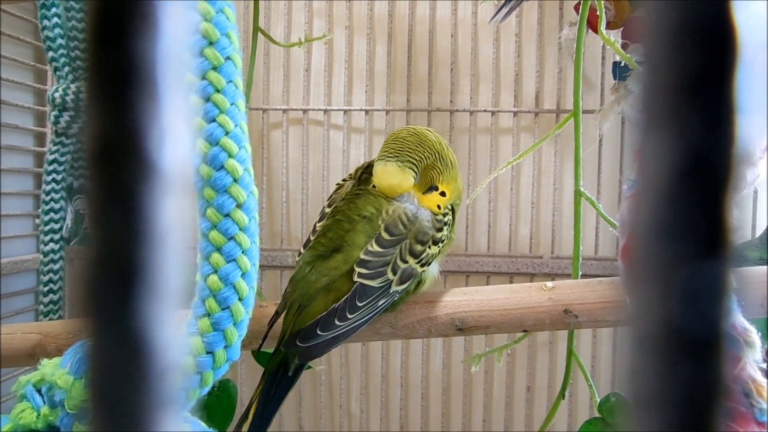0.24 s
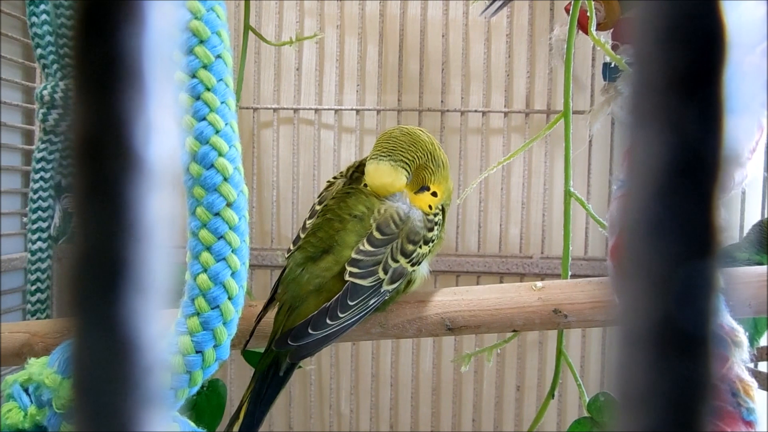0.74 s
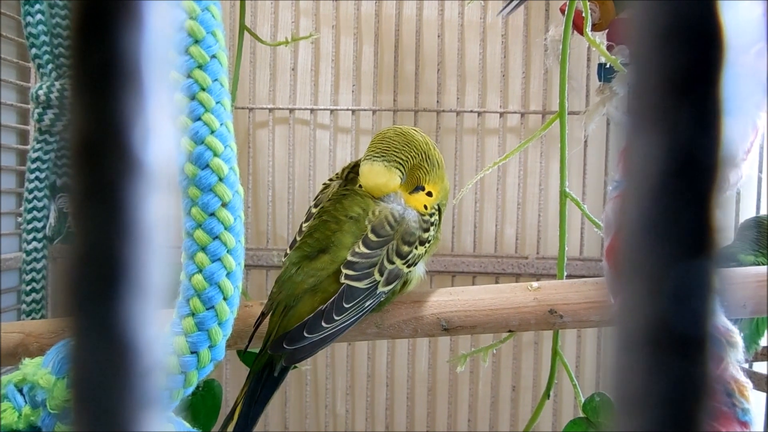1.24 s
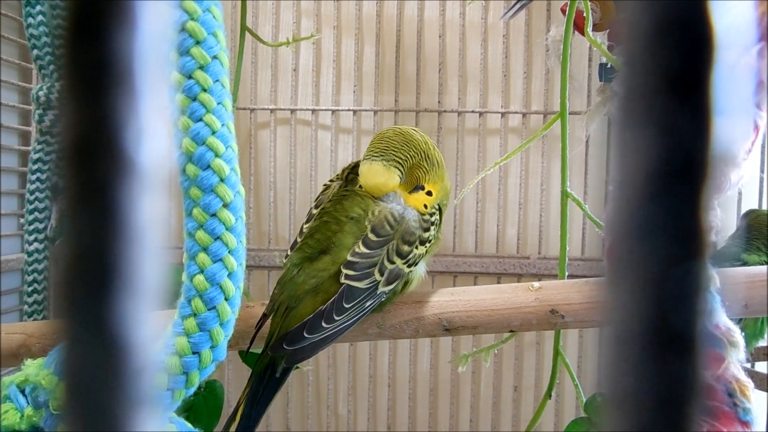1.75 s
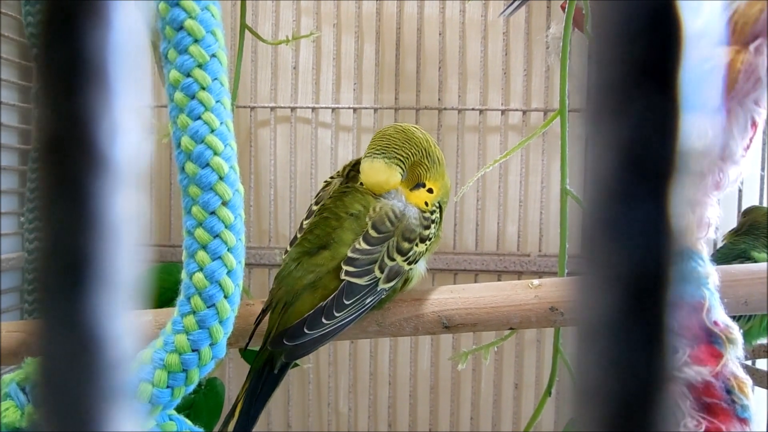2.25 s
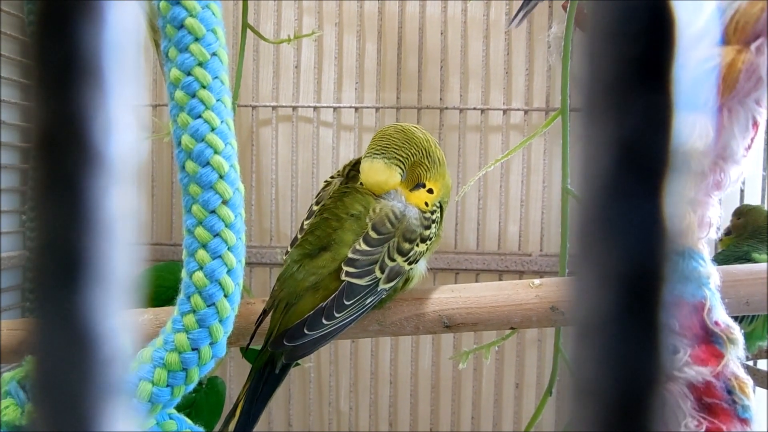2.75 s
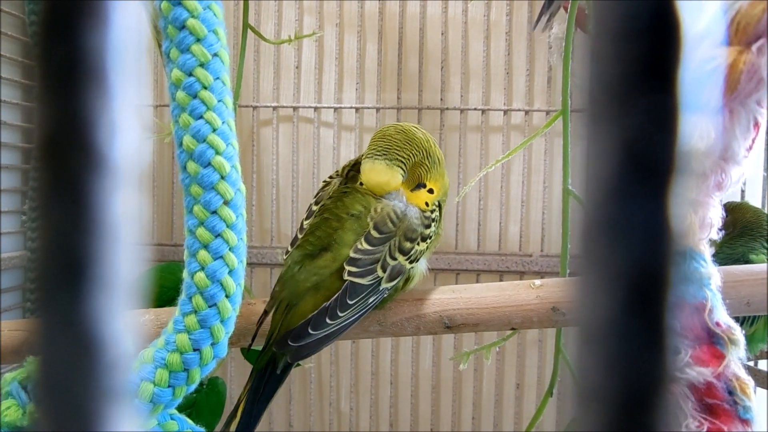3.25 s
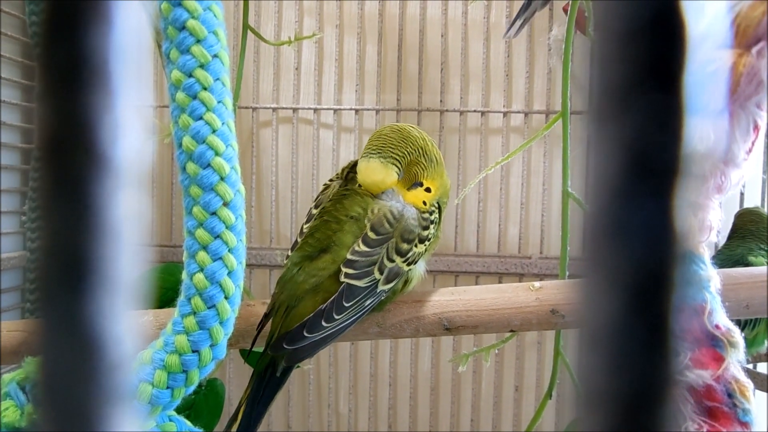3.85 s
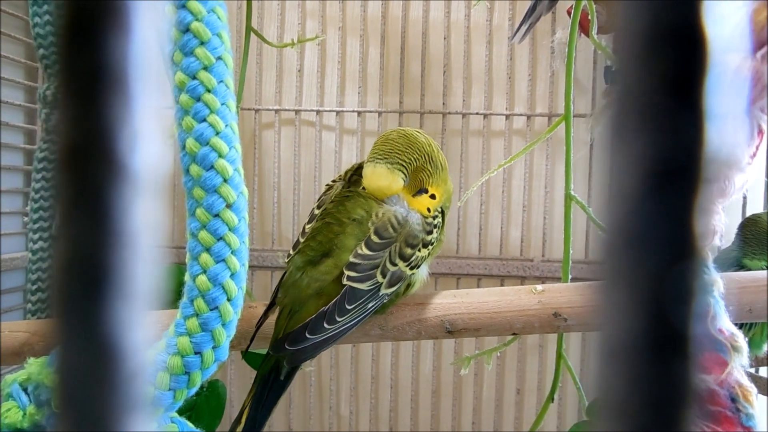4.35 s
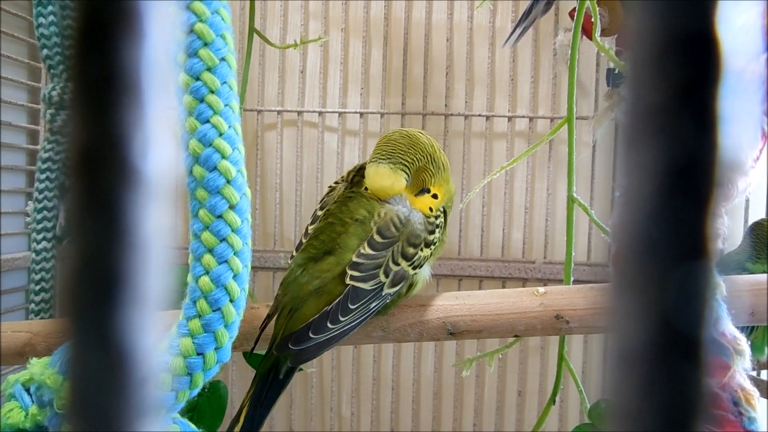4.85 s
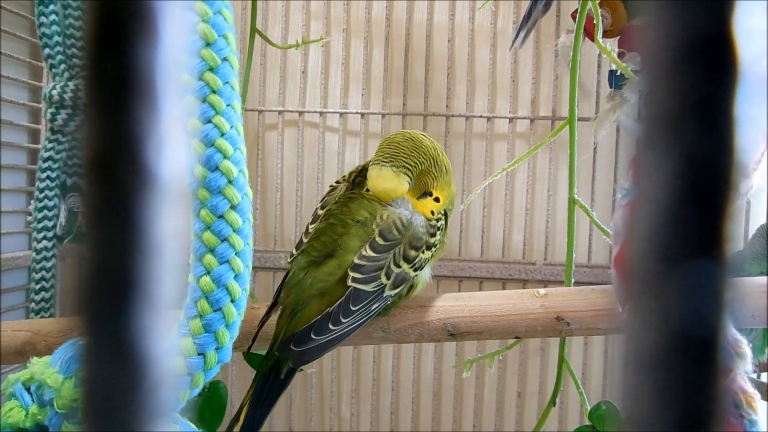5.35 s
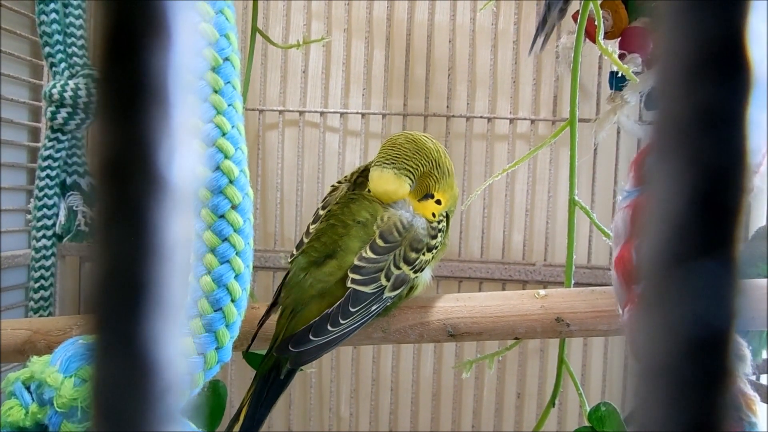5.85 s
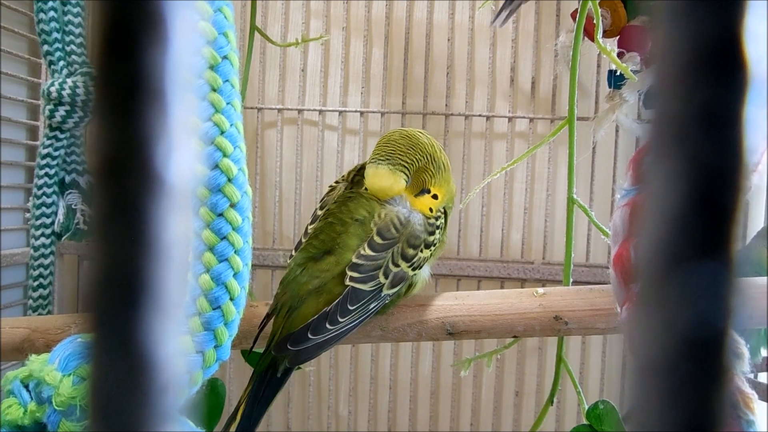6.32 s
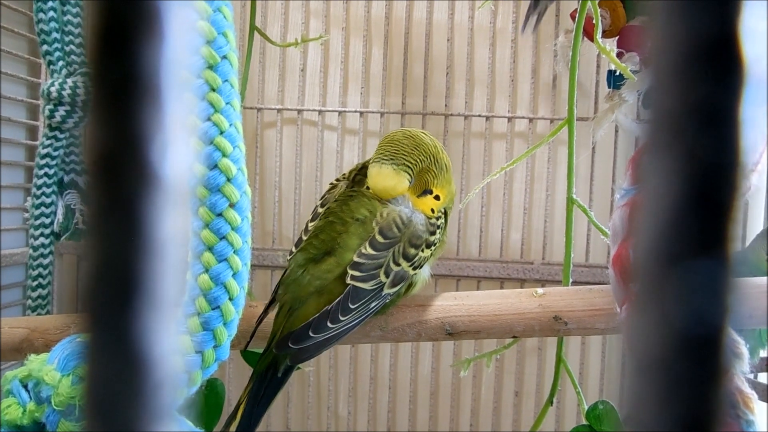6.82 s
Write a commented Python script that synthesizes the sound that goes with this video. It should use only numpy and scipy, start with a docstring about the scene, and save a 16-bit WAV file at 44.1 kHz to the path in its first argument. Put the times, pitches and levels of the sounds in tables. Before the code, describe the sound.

Close, bright budgerigar chatter, slightly right of centre, in a small live room. Near birds trade sharp chirps, tiny clicking chips, tumbling twitter runs and pulsed, scratchy squawks in irregular clusters. Farther birds keep up a softer busy warble with tiny lulls. A thin constant hush lies beneath. Two squawks come close together near the end, then only a few light notes follow as the background chatter continues.

```python
"""Caged budgerigars indoors, near the ear: gliding whistles and chips start at once, a squawk follows at 0.8 s.
Whistles, chips, squawks and twittering phrases overlap; a nasal buzz comes at 4.2 s, dense whistles near 5.1 s.
Two squawks near 6.8 s and a few late notes close it. Farther birds warble, with lulls, over a steady hush.
Whistles are swept overtone series, squawks pulsed tone and rasp, chips steep sweeps, the hush shaped noise.
Surfaces colour the calls, the room rings after them, and the loudest calls overload the recorder."""
import sys
import numpy as np
from scipy import signal
from scipy.fft import rfft, irfft
from scipy.io import wavfile

SR = 44100
rng = np.random.default_rng(int(sys.argv[2]) if len(sys.argv) > 2 else 0)


def pcm_store(signal):
    """Save signal as 16-bit PCM."""
    levels = np.round(np.clip(np.atleast_2d(signal), -1, 1) * 32767)
    wavfile.write(sys.argv[1], SR, levels.astype(np.int16).T)


N = 312228

# Steady hush spectrum. Each row: frequency in Hz, relative density in dB per Hz.
HUSH_SPECTRUM = [(20, 2), (60, 3.5), (100, -4), (600, -3), (1300, 1.5), (3200, 6), (5000, -12.5),
                 (13000, -16)]
HUSH_LEVEL_DB = -45
# Room decay. Each row: frequency in Hz, 60 dB decay time in seconds.
ROOM_DECAY = [(300, 0.05), (1200, 0.66), (3000, 0.78), (7000, 0.87), (12000, 0.59)]
# Pauses of the far birds. Each row: start in seconds, end in seconds.
FAR_LULLS = [(.6, 0.75), (.88, 1.026), (2.27, 2.45), (3.04, 3.4), (4.1, 4.24), (4.55, 4.67), (4.87, 5.12),
             (5.68, 5.7)]
# Throat and beak response to the overtones. Each row: frequency in Hz, gain in dB.
BEAK_RESPONSE = [(1500, -11), (3200, -2.5), (4600, -4.5), (6200, -9.5), (8200, -2), (9300, -13),
                 (13000, -29.5)]
# Colour of a hoarse squawk. Each row: frequency in Hz, relative density in dB per Hz.
RASP_SPECTRUM = [(120, -53), (250, -39), (625, -25.5), (1350, -15), (2100, -5), (3600, 2), (5600, 5),
                 (8200, 4.5), (13200, -27)]
# Low sliding notes, often closing a phrase. Each row: start in seconds, length in seconds, level in dB.
LOW_SLIDES = [(0.045, .04, -30), (.24, 0.074, -33.5), (0.582, 0.068, -36.5), (0.978, .05, -34),
              (1.09, .1, -34.5), (1.258, 0.097, -33), (1.457, 0.064, -40), (1.731, 0.063, -33),
              (2.052, 0.045, -31), (2.364, 0.068, -35), (2.609, 0.058, -41), (2.742, .045, -36.5),
              (2.994, 0.056, -31.5), (3.275, 0.034, -32), (3.356, 0.062, -39.5), (3.785, .05, -38),
              (4.106, 0.094, -36), (4.864, .05, -32), (5.162, .028, -29.5), (5.233, 0.053, -30.5),
              (5.428, 0.034, -39), (5.558, 0.068, -33), (6.021, .06, -35.5), (6.191, 0.085, -35),
              (6.588, 0.05, -42.5)]
# Pitch of every low slide: start in Hz, middle in Hz, end in Hz.
SLIDE_PITCH_HZ = (1824, 1348, 940)
# Quick runs of syllables stepping down in pitch.
# Each row: start in seconds, length in seconds, level in dB, overtone level in dB.
TWITTER_PHRASES = [(0.027, 0.06, -18.5, -9), (.12, 0.25, -27.5, -10.5), (0.453, .13, -25, -10.5),
                   (1.109, 0.16, -34.5, -2.5), (1.362, 0.067, -32.5, -1.5), (1.52, 0.17, -25, -9.5),
                   (1.821, 0.16, -30.5, -7.5), (2.01, .07, -16.5, -8), (2.482, .22, -31, -5),
                   (2.711, 0.18, -31.5, -8), (2.877, .15, -29, -8.5), (3.198, .12, -25, -12),
                   (3.471, .14, -31, -10.5), (3.921, 0.18, -34, -20), (4.295, .16, -36.5, -11),
                   (4.69, .17, -27, -3.5), (5.055, .12, -21.5, -7), (5.352, .11, -24.5, -1),
                   (5.81, .19, -25, -13), (6.124, 0.11, -21, -8), (6.279, 0.11, -30.5, -19),
                   (6.601, 0.11, -32.5, -11), (6.968, 0.054, -31.5, -24)]
PHRASE_TOP_HZ, PHRASE_END_HZ = 3170, 2089
SYLLABLE_S, SYLLABLE_FALL_OCT, SYLLABLE_ARCH_OCT = .026, 0.2986, 0.1003
# Click-like whistles. Each row: start in seconds, peak level in dB before the trim, pitch in Hz at 30 % of its length.
NEAR_CHIPS = [(.211, -11, 3080), (0.314, -20, 3240), (0.739, -27, 3000), (1.42, -15, 2586),
              (2.011, -7, 2500), (2.113, -16.5, 4660), (2.332, -12, 4360), (3.183, -9.5, 3000),
              (3.501, -10.5, 2550), (3.654, -5.5, 3310), (3.85, -9, 3334), (4.076, -13.5, 3405),
              (5.042, -14.5, 2990)]
# Pulsed harsh calls. Each row: start in seconds, length in seconds, level in dB, pitch in Hz,
# pulse rate per second, roughness 0-1, loudest moment as a fraction of the length.
NEAR_SQUAWKS = [(.762, 0.11, -8.5, 2890, 157, 0.78, 0.76), (2.006, 0.084, -21, 2686, 150, 0.56, 0.9),
                (2.14, 0.13, -12, 3120, 130, 0.79, 0.57), (2.485, 0.085, -16.5, 3050, 174, 0.5, 0.76),
                (4.48, 0.066, -14.5, 2946, 155, 0.34, 0.72), (5.148, 0.03, -31, 3600, 160, 0.47, 0.5),
                (5.603, 0.07, -13.5, 2980, 170, 0.28, 0.99), (6.12, 0.084, -36, 3200, 160, 0.62, 0.28),
                (6.424, 0.13, -14, 2892, 172, 0.86, 0.32), (6.772, 0.11, -11.5, 3424, 176, 0.82, 0.58),
                (6.854, 0.067, -15.5, 2838, 157, 0.39, 0.93)]
# Prominent whistles. Each row: start in seconds, length in seconds, centre pitch in Hz, fall in octaves,
# level in dB, overtone level in dB.
NEAR_CHIRPS = [(0, 0.019, 3155, 0.014, -12.5, -14), (.014, 0.046, 2308, 0.63, -15, -7.5),
               (0.136, .033, 3130, 0.45, -18, -10.5), (.217, .05, 2910, 0.59, -23.5, -8.5),
               (0.513, 0.065, 3100, 0.87, -25.5, -14), (1.058, 0.041, 2400, 0.41, -24.5, -3),
               (1.182, .032, 2250, 0.51, -25.5, -8.5), (1.437, 0.032, 2400, .9, -27.5, -8.5),
               (1.608, 0.042, 2880, 0.74, -14, -19), (1.676, 0.044, 3083, .36, -10.5, -15),
               (1.974, 0.035, 3583, .3, -12, -7.5), (2.022, 0.037, 2917, .4, -12.5, -28),
               (2.433, 0.051, 3550, 0.28, -25, -5.5), (3.134, 0.033, 3050, 0.07, -20.5, -8.5),
               (3.164, .034, 3510, 0.2, -22, -7), (3.225, 0.062, 3118, .4, -16, -13.5),
               (3.312, .05, 2355, 0.33, -32, -25), (3.612, .066, 2700, 0.35, -25.5, -18),
               (3.748, 0.028, 2513, 0, -21.5, -28), (3.776, 0.061, 3594, 0.41, -22, -13.5),
               (3.844, .03, 3090, 0.063, -17, -19), (4.714, 0.06, 3020, 0.82, -18.5, -6),
               (4.8, .056, 3113, 0.58, -18, -10), (5.063, .043, 3822, 0.091, -13.5, -7),
               (5.108, 0.021, 3106, .35, -10.5, -9), (5.127, .032, 3250, 0.11, -7.5, -24),
               (5.157, .03, 3284, 0.43, -14, -11), (5.252, 0.042, 2150, 0.32, -29.5, -32),
               (5.353, 0.021, 2600, .3, -24, -6), (5.393, 0.046, 2950, -0.26, -17.5, -13),
               (5.511, 0.051, 2405, 0.64, -22, -33), (5.851, 0.059, 2290, 0.33, -22.5, -9),
               (6.019, 0.071, 3900, 0.19, -22.5, -7.5), (6.093, 0.035, 3253, 0.086, -9.5, -13),
               (6.147, 0.049, 2734, 0.62, -18, -25), (7.036, .048, 2994, 0.604, -25, -30)]
CHIRP_ARCH_OCT = 0.0499
BAND_LIMIT_HZ = 13500


def gain_of(db):
    """Decibels to amplitude."""
    return 10 ** (np.asarray(db) / 20)


def evened(x):
    """Scales to an rms of one."""
    return x / np.sqrt(np.mean(x ** 2) + 1e-20)


def read(points, hz):
    """Interpolates a frequency table on a log-frequency axis."""
    table_hz, value = np.transpose(points)
    return np.interp(np.log(hz + 1), np.log(table_hz), value)


def add(mix, start_s, sound):
    """Adds a stereo sound at start_s, cut at the end of the mix."""
    first = max(round(start_s * SR), 0)
    part = mix[:, first:][:, :sound.shape[1]]
    part += sound[:, :part.shape[1]]


def wobble(t, rate_hz, count=512):
    """Random unsteadiness: straight lines between rate_hz random values per second."""
    return np.interp(t * rate_hz, np.arange(count), rng.standard_normal(count))


def noise(spectrum, count, size=8192):
    """Random noise filtered to the given spectrum."""
    size = max(size, count)
    colour = gain_of(read(spectrum, np.fft.rfftfreq(size, 1 / SR)))
    coloured = irfft(rfft(rng.standard_normal(size)) * colour, size)
    return evened(coloured)[:count]


def hush():
    """Steady background noise, independent in each channel."""
    return gain_of(HUSH_LEVEL_DB) * np.array([noise(HUSH_SPECTRUM, N), noise(HUSH_SPECTRUM, N)])


def room(x, rise_s=0.011, size=256):
    """A diffuse tail: noise that fades in, then dies at its own speed in each band."""
    hz, t, bands = signal.stft(rng.standard_normal((2, SR)), SR, nperseg=size)
    decay = gain_of(-60 * t / read(ROOM_DECAY, hz)[:, None])
    bands = bands * decay * np.minimum(t / rise_s, 1)
    tail = signal.istft(bands, SR, nperseg=size)[1]
    tail = tail / np.linalg.norm(tail[0])
    return signal.fftconvolve(x.mean(0)[None], tail, axes=1)[:, :N]


def perch(call, reach_s=.011, count=10, size=1024, echo_db=-6.5):
    """Direct sound plus early reflections, along random paths for every call."""
    paths = np.zeros((2, size))
    for ear in paths:
        late = rng.random(count)
        at = np.minimum(4 + late * reach_s * SR, size - 1).astype(int)
        bounces = rng.choice([-1, 1], count) * np.exp(-2 * late)
        ear[at] = gain_of(echo_db) * evened(bounces) / np.sqrt(count)
    left_delay = rng.choice([0, 0, 1, 2, 3])  # samples
    paths[0, left_delay] = 1
    paths[1, 0] = 1
    # so small a body gives no bass
    bass_cut = signal.butter(2, 450, "high", fs=SR, output="sos")
    thin = signal.sosfilt(bass_cut, call)
    return signal.fftconvolve(thin[None], paths, axes=1)


def syrinx(hz, overtones_db, tilt_db=-3, count=8):
    """A fundamental with locked overtones, tilted and then shaped by the beak."""
    phase = 2 * np.pi * np.cumsum(hz) / SR
    k = np.arange(2, count + 1)[:, None]
    overtone_db = overtones_db + tilt_db * (k - 2) + read(BEAK_RESPONSE, k * hz)
    overtones = gain_of(overtone_db) * (k * hz < BAND_LIMIT_HZ)
    return np.sin(phase) + (overtones * np.sin(k * phase)).sum(0)


def chirp(length_s, start_hz, middle_hz, end_hz, db, overtones_db,
          jitter=0.035, flutter_db=4.5, attack_s=0.0027, fade=0.16):
    """A whistle on a parabolic pitch curve; high notes zigzag quickly, low ones glide more evenly."""
    t = np.arange(0, max(length_s, .008), 1 / SR)
    progress = t / t[-1]
    curve = np.polyfit([0, .5, 1], [start_hz, middle_hz, end_hz], 2)
    hz = np.polyval(curve, progress)
    zigzag = np.interp(hz, [1500, 2800], [.02, .075]) * wobble(t, 170)
    hz = hz * (1 + jitter * wobble(t, 2400) + zigzag)
    attack = np.minimum(t / attack_s, 1)
    release = np.minimum((1 - progress) / fade, 1)
    strength = attack * release * gain_of(flutter_db * wobble(t, 400))
    strength = strength / np.sqrt(1 + (950 / hz) ** 8)  # low notes are poorly radiated
    voice = syrinx(hz, overtones_db + 1.96 * wobble(t, 349))
    return perch(gain_of(db) * evened(strength) * np.sqrt(2) * voice)


def stroke(length_s, pitch_hz, fall_oct, db, overtones_db, arch_oct=CHIRP_ARCH_OCT):
    """A chirp falling through its pitch, bulging above the straight fall."""
    octaves = np.array([fall_oct / 2 - arch_oct, arch_oct, -fall_oct / 2 - arch_oct])
    return chirp(length_s, *(pitch_hz * 2 ** octaves), db, overtones_db)


def warble(count, low_hz, high_hz, db, overtones_db, spread=.27):
    """Farther birds: random chirps, mostly downward, left out during the lulls."""
    out = np.zeros((2, N))
    for k in range(count):
        centre_s = (k + rng.random()) / count * N / SR
        length_s = rng.uniform(.014, .045)
        bend = spread * rng.uniform(-1, 1, 3) + [0, 0, -.2]
        contour_hz = np.minimum(rng.uniform(low_hz, high_hz) * np.exp(bend), 4300)
        if any(start_s < centre_s < end_s for start_s, end_s in FAR_LULLS):
            continue
        call_db = db + 2 * rng.standard_normal()
        call_overtones_db = overtones_db + 4 * rng.standard_normal()
        call = chirp(length_s, *contour_hz, call_db, call_overtones_db)
        add(out, centre_s - length_s / 2, call)
    return out


def far_birds():
    """Two random layers behind: many high chirps and fewer low sliding notes."""
    high = warble(count=260, low_hz=2005, high_hz=3408, db=-32.5, overtones_db=-17.5)
    low = warble(count=60, low_hz=1199, high_hz=1798, db=-36.5, overtones_db=-45)
    return high + low


def buzz(length_s=.215, low_hz=700, rise_hz=210, db=-34, overtones_db=11):
    """A nasal note: strong overtones on a low pitch that rises in two arches."""
    t = np.arange(0, length_s, 1 / SR)
    arches = abs(np.sin(2 * np.pi * t / length_s))
    hz = (low_hz + rise_hz * arches) * (1 + 0.053 * wobble(t, 1100))
    voice = syrinx(hz, overtones_db + 3 * wobble(t, 56))
    voice = voice * gain_of(3.9 * wobble(t, 302.3))
    return perch(gain_of(db) * evened(voice) * signal.windows.tukey(len(t), .1))


def phrase(length_s, db, overtones_db, scatter_oct=0.3, fall_spread_oct=0.82,
           accent_db=0.5, legato=1.1, count=9):
    """Up to count linked syllables, some rising, most falling, sink in pitch; yields (delay s, sound)."""
    for k, (pitch, fall, accent) in enumerate(rng.uniform(-1, 1, (count, 3))):
        progress = (k + .5) * SYLLABLE_S / length_s
        if progress >= 1:
            break
        hz = np.interp(progress, [0, 1], [PHRASE_TOP_HZ, PHRASE_END_HZ]) * 2 ** (scatter_oct * pitch)
        fall_oct = SYLLABLE_FALL_OCT + fall_spread_oct * fall
        syllable_db = db + accent_db * accent
        syllable = stroke(legato * SYLLABLE_S, hz, fall_oct, syllable_db, overtones_db, SYLLABLE_ARCH_OCT)
        yield k * SYLLABLE_S, syllable


def chip(db, pitch_hz, length_s=.01, sweep=0.813, overtones_db=-4, trim_db=-3):
    """A falling whistle so short and steep that it sounds like a click."""
    u = np.arange(0, 1, 1 / (length_s * SR))
    burst = u * np.exp(-u / 0.31) * (1 - u)
    hz = pitch_hz * np.exp(sweep * (.3 - u) * 2)
    return perch(gain_of(db + trim_db) * burst / burst.max() * syrinx(hz, overtones_db))


def squawk(length_s, db, pitch_hz, pulse_hz, rough, crest, arch=.45):
    """Rapid pulses, each a tiny arched chirp with a strong octave; roughness trades tone for rasp."""
    t = np.arange(0, length_s, 1 / SR)
    rough, crest = np.clip(rough, 0, 1), np.clip(crest, .1, .9)
    turns = np.cumsum(pulse_hz * (1 + 0.074 * wobble(t, 124))) / SR
    opening = np.sin(np.pi * turns) ** 2
    unsteady = 0.083 * wobble(t, 200) + 0.0957 * rough * wobble(t, 2500)
    hz = pitch_hz * (1 + arch * (np.sqrt(opening) - .92) + unsteady)
    tone = evened(syrinx(hz, 8, tilt_db=-13) * opening)
    rise_and_fall = np.sin(np.pi * np.interp(t / length_s, [0, crest, 1], [0, .5, 1])).clip(0)
    swell = rise_and_fall ** (0.076 + rough)
    blur = .6 * rough * swell  # the pulses run together at full force
    rasp = evened(noise(RASP_SPECTRUM, len(t)) * (blur + opening))
    voice = np.sqrt(1 - rough) * tone + np.sqrt(rough) * rasp
    return perch(gain_of(db) * evened(swell * voice))


def scolding():
    """All near squawks."""
    out = np.zeros((2, N))
    for start_s, *row in NEAR_SQUAWKS:
        add(out, start_s, squawk(*row))
    return out


def near_song(slide_overtones_db=-11):
    """The nearest birds: one buzz, low slides, twittering phrases, chips and loud chirps."""
    song = np.zeros((2, N))
    add(song, 4.238, buzz())
    for start_s, length_s, db in LOW_SLIDES:
        add(song, start_s, chirp(length_s, *SLIDE_PITCH_HZ, db, slide_overtones_db))
    for start_s, *row in TWITTER_PHRASES:
        for delay_s, syllable in phrase(*row):
            add(song, start_s + delay_s, syllable)
    for start_s, *row in NEAR_CHIPS:
        add(song, start_s, chip(*row))
    for start_s, *row in NEAR_CHIRPS:
        add(song, start_s, stroke(*row))
    return song


def scene(song_room_db=-13, squawk_room_db=-11, far_room_db=-6):
    """Hush, far birds and near birds in the room, a little to the right."""
    background = hush()
    far = far_birds()
    squawks = scolding()
    song = near_song()
    room_feed = gain_of(song_room_db) * song + gain_of(squawk_room_db) * squawks + gain_of(far_room_db) * far
    balance = gain_of([[-1.8], [1.4]])  # left, right in dB
    return (song + squawks + far + room(room_feed) + background) * balance


def record(dry, ceiling=0.89):
    """Overload rounds off the loudest peaks; then come a bass cut and the band limit."""
    rounded = dry / (1 + (dry / ceiling) ** 6) ** (1 / 6)
    bass_cut = signal.butter(1, 170, "high", fs=SR, output="sos")
    low_pass = signal.firwin(511, BAND_LIMIT_HZ, window=("kaiser", 9), fs=SR)
    return signal.oaconvolve(signal.sosfilt(bass_cut, rounded), low_pass[None], "same")


dry = scene()
out = record(dry)
pcm_store(out)
```